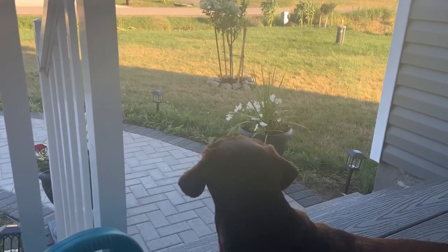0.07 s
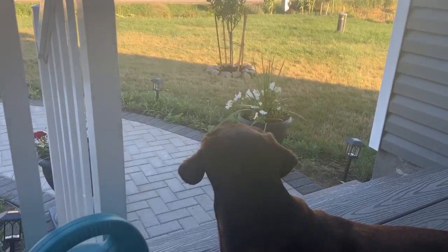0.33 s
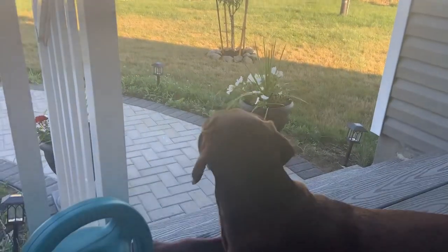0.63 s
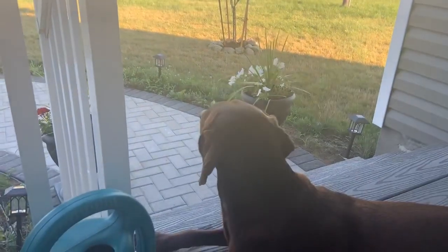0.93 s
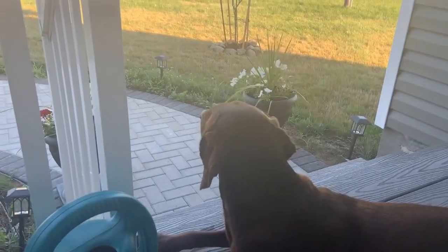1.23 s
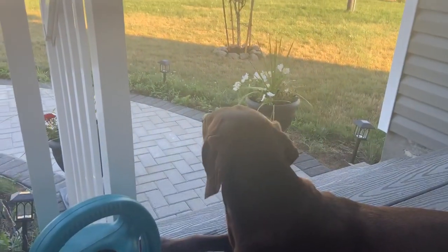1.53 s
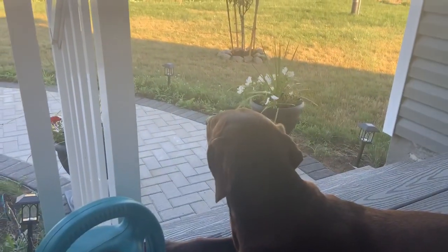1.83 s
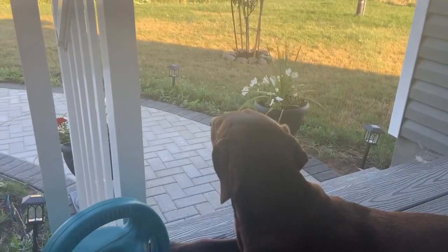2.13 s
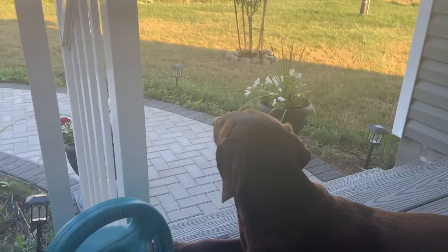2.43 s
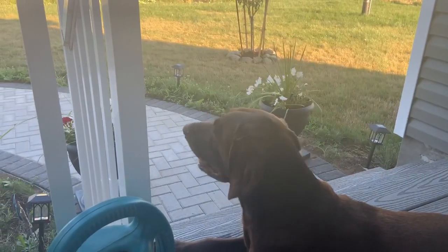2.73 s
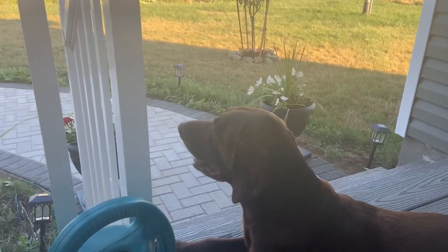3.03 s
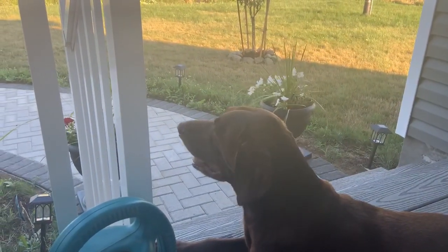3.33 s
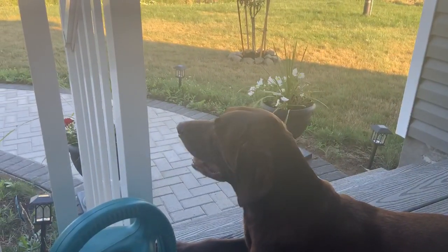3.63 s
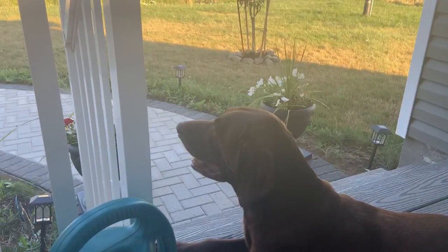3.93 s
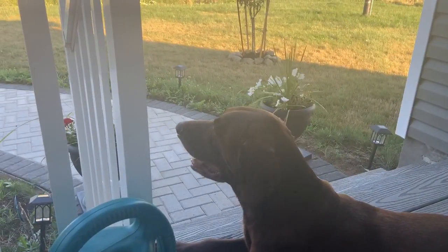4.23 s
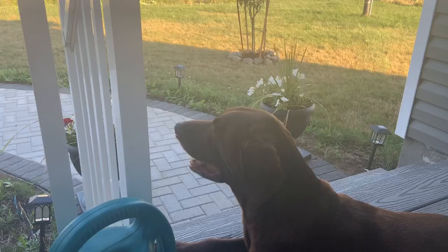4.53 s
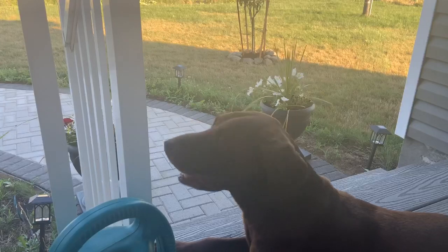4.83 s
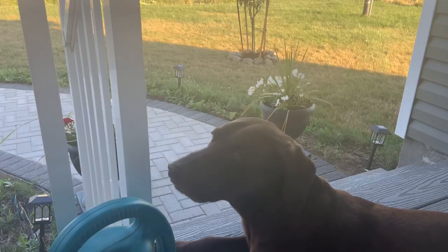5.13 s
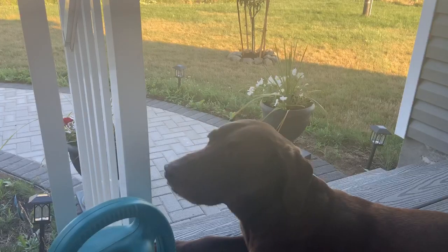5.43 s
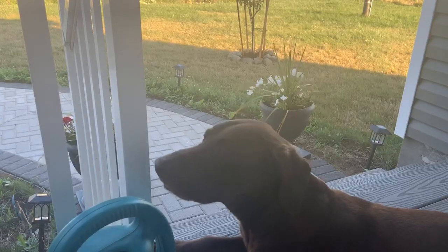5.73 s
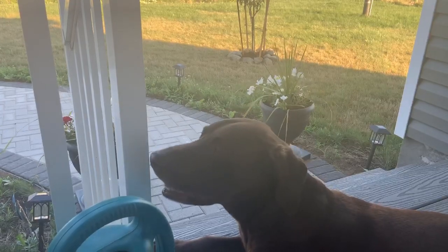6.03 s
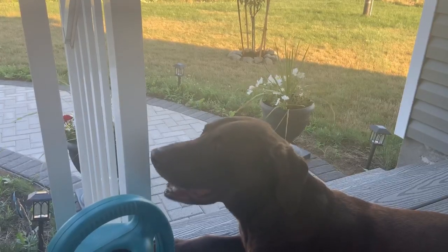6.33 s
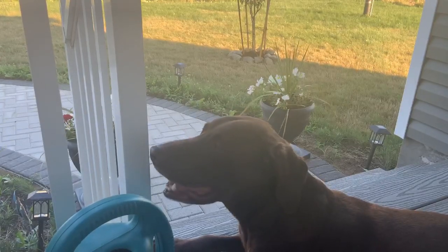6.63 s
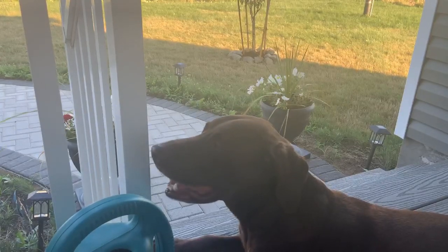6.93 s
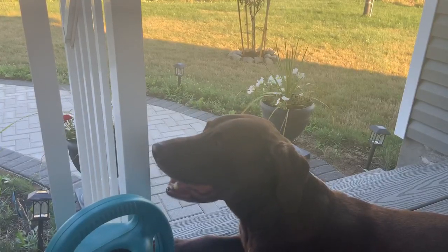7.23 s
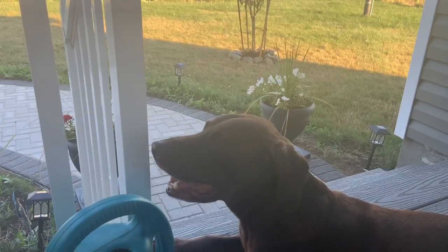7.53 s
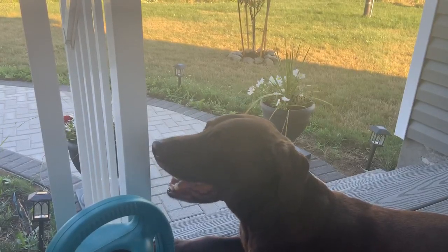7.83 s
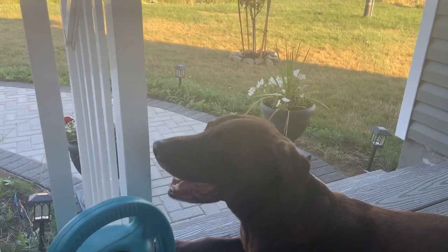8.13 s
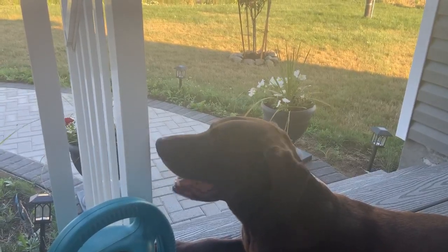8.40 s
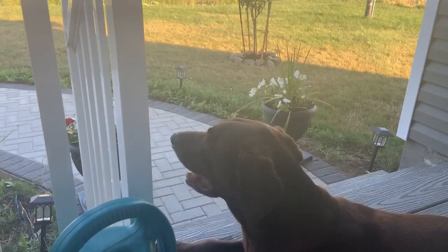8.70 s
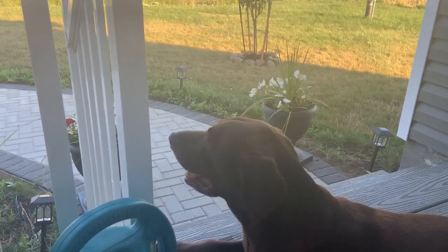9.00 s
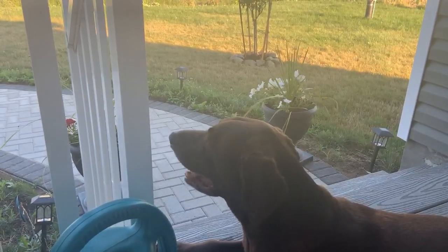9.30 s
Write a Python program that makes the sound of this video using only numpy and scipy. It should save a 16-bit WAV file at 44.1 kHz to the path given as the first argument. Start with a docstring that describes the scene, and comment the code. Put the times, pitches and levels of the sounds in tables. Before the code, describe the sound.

Crickets trill and buzz steadily outdoors over a distant traffic rumble, with a few soft, low microphone thumps.

```python
"""Crickets sing in the lawn by a porch on a summer evening, scraping one wing along the other.
Each stroke makes a tiny falling tone: some crickets run these into trills, one pulses in long bouts
and several give short high buzzes. Behind them are thin tree cricket tones and far engines and tyres.
Now and then soft thumps and knocks shake a hand-held camera. Something light rustles a few times,
and a far bird squeaks once."""
import sys
import numpy as np
from scipy import signal
from scipy.fft import rfft, irfft, next_fast_len
from scipy.io import wavfile
from scipy.ndimage import uniform_filter1d, map_coordinates

SR = 44100
rng = np.random.default_rng(int(sys.argv[2]) if len(sys.argv) > 2 else 0)


def transcribe(u):
    """Save the signal u as a 16-bit wav file named by the first command-line argument.

    u: samples, shape (n,) or (channels, n), limited to [-1, 1]; the rate is SR.
    q: integer samples, one column per channel.
    """
    v = np.clip(np.atleast_2d(u).T, -1, 1)
    q = np.round(v * 32767).astype(np.int16)
    wavfile.write(sys.argv[1], SR, q)


N = 421596


def amp(db):
    """Turn decibels into a gain to multiply by."""
    return 10 ** (np.asarray(db) / 20)


def unit(x):
    """Scale a sound so its average strength (rms) is 1."""
    return x / np.sqrt(np.mean(x ** 2) + 1e-20)


def clock(seconds):
    """The time of each sample in a stretch of seconds."""
    return np.arange(int(seconds * SR)) / SR


def along(points, hz):
    """Read between (Hz, value) points, spacing octaves evenly."""
    freqs, values = np.transpose(points)
    return np.interp(np.log(hz + 1), np.log(freqs), values)


def curve(rows):
    """Join (seconds, value) points with straight lines."""
    times, values = np.transpose(rows)
    return np.interp(np.arange(N) / SR, times, values)


def wobble(rate):
    """A smooth curve through `rate` random values a second."""
    return map_coordinates(rng.standard_normal(int(N * rate / SR) + 4), [np.arange(N) * rate / SR])


def swell(peak_s, width_s, db):
    """A gain that rises and falls in a bell shape around one moment."""
    return amp(db) * np.exp(-((np.arange(N) / SR - peak_s) / width_s) ** 2 / 2)


def bump(u):
    """A soft rise to 1 at u = 1, then a quick fade."""
    return u ** 2 * np.exp(2 * (1 - u))


def add(track, s, sound):
    """Mix a sound into a track, starting at s seconds."""
    part = track[max(round(s * SR), 0):][:len(sound)]
    part += sound[:len(part)]


def filtered(x, response):
    """Multiply each frequency in a sound by response(hz)."""
    size = next_fast_len(N + SR // 2)
    return irfft(rfft(x, size) * response(np.fft.rfftfreq(size, 1 / SR)), size)[..., :N]


def arrive(x, lead_ms):
    """Sound from one side reaches the left ear lead_ms before the right."""
    return filtered(x, lambda hz: np.exp(1j * np.pi * hz * lead_ms / 1000 * np.array([[1], [-1]])))


# How alike the two ears hear noise. Each row: frequency in Hz, likeness from 0 to 1.
LIKENESS = [(60, 0.88), (200, 0.89), (330, 0.95), (570, 0.25), (1000, 0.064), (3200, 0.59), (5000, 0.075)]
def rush(spectrum, alike=LIKENESS, lead_ms=0):
    """Stereo noise: one part is the same in both ears, the other is opposite."""
    turn = lambda hz: np.arccos(np.clip(along(alike, hz), -1, 1)) / 2
    colour = lambda hz: amp(along(spectrum, hz)) * [np.cos(turn(hz)), np.sin(turn(hz))]
    same, opposite = filtered(rng.standard_normal((2, N)), colour)
    return unit(arrive(np.array([same + opposite, same - opposite]), lead_ms))


# The yard's echo. Each row: frequency in Hz, seconds to fade by 60 dB.
YARD_FADE = [(2000, 0.14), (6000, 0.1), (10000, 0.094)]
def yard(x, lead_ms, wet_db):
    """Grass, steps and walls add a short scattered echo, wet_db above the direct sound."""
    hz, t, noise = signal.stft(rng.standard_normal((2, SR // 4)), SR, nperseg=256)
    tail = signal.istft(noise * amp(-60 * t / along(YARD_FADE, hz)[:, None]), SR, nperseg=256)[1]
    echo = signal.fftconvolve(x[None], tail / np.linalg.norm(tail[0]), axes=1)[:, :N]
    return (arrive(x, lead_ms) + amp(wet_db) * echo) / np.hypot(1, amp(wet_db))


def linger(x, fade_s):
    """The longer echo between house and trees, dropping 60 dB in fade_s."""
    t = clock(.5)
    tail = rng.standard_normal(len(t)) * amp(-60 * t / fade_s)
    return signal.fftconvolve(x, tail / np.linalg.norm(tail))[:N]


def trill(rate, start_hz, end_hz, stroke_s, judder, drift, rough):
    """An unbroken run of falling wing strokes; judder breaks each into three quick pulses."""
    strokes_done = np.cumsum(rate * (1 + drift * wobble(3))) / SR + rng.random()
    t = strokes_done % 1 / rate
    progress = np.minimum(t / stroke_s, 1)
    phase = 2 * np.pi * t * (start_hz + (end_hz - start_hz) * progress / 2) + rough * wobble(120)
    pulses = 1 - judder * np.cos(2 * np.pi * 3 * progress)
    return unit(np.abs(np.sin(np.pi * progress)) * pulses * np.sin(phase))


# The chorus singers. Each row: strokes a second, start and end pitch in Hz, stroke length in seconds,
# judder from 0 to 1, relative level in dB, throbs a second, throb depth in dB, left ear's lead in ms.
TRILLERS = [(83.7, 6120, 5330, .0098, .55, 0, 11.3, 3.4, .06),
            (65, 5620, 5230, .009, 0, -6.5, 11.3, 2, -.03), (96, 6060, 5620, .008, 0, -6.5, 7.5, 2, .02)]
# Their joint loudness. Each row: time in seconds, level in dB before the boost.
CHORUS_LEVELS = [(0.1, -74), (0.68, -74.5), (1.93, -74), (2.98, -69.5), (5.6, -76), (7.5, -73),
                 (9.11, -72.5), (9.5, -72.5)]
# A nearer, rougher cricket swells twice. Each row: peak time and half-width in seconds, level in dB.
NEAR_SWELLS = [(.7, 0.59, -63.5), (3.0, 0.76, -67.5)]
# A lower, purer one fades early. Each row: time in seconds, level in dB.
LOW_LEVELS = [(0, -79), (.8, -76), (1.7, -73.5), (2.2, -79), (3.1, -84.5), (4.2, -86), (9.5, -87)]
def chorus(boost_db=5):
    """Several ground crickets trill at once, each throbbing at its own pace."""
    t = np.arange(N) / SR
    voices, sway = np.zeros((2, N)), 2.2 * wobble(1.9)
    for rate, start_hz, end_hz, stroke_s, judder, db, throb_rate, throb_db, lead_ms in TRILLERS:
        throb = throb_db * np.sin(2 * np.pi * throb_rate * t + sway) + wobble(14)
        song = trill(rate, start_hz, end_hz, stroke_s, judder, drift=.003, rough=.85)
        voices += amp(db + throb) * yard(song, lead_ms, wet_db=-2.5)
    near = amp(1.3 * wobble(40)) * trill(86, 6190, 5540, .0098, judder=.2, drift=.007, rough=1.2)
    near_gain = np.max([swell(*row) for row in NEAR_SWELLS], axis=0)
    low = trill(65, 5420, 5290, .014, judder=0, drift=.004, rough=.8)
    return (amp(curve(CHORUS_LEVELS) + boost_db) * unit(voices)
            + near_gain * yard(near, lead_ms=.026, wet_db=-1.5)
            + amp(curve(LOW_LEVELS)) * unit(yard(low, lead_ms=.029, wet_db=-1.5)))


def patchy(x, depth_db):
    """Many far voices come and go: each patch of time and frequency gets its own gain."""
    patches = signal.stft(x, nperseg=512)[2]
    gains = rng.standard_normal(patches.shape[1:])
    gains = uniform_filter1d(gains, 3, axis=0)  # smooth across frequency
    gains = uniform_filter1d(gains, 14, axis=1)  # and across time
    return unit(signal.istft(patches * amp(depth_db * unit(gains)), nperseg=512)[1][:, :N])


# The road's loudness. Each row: time in seconds, level in dB before the boosts.
TRAFFIC_LEVELS = [(0.0, -61.5), (0.7, -64.5), (1.7, -61), (3.1, -61), (3.7, -61.5), (4.3, -60),
                  (5.8, -59.5), (7.2, -63), (8.1, -61), (9.56, -61)]
# The tone of engines and of tyres. Each row: frequency in Hz, relative level in dB.
ENGINE_SPECTRUM = [(13, -47), (22, -15.5), (30, -25.5), (43, 3), (91, -0.5), (104, -0.5), (146, -11.5),
                   (204, -9.5), (238, -14.5), (280, -12), (385, -17), (461, -18.5), (522, -27.5),
                   (600, -20.5), (780, -51), (1320, -120)]
TYRE_SPECTRUM = [(230, -22), (380, -7.5), (480, -3.5), (580, -4.5), (720, -2), (900, -1), (1050, -5.5),
                 (1300, -10), (1600, -14.5), (2200, -20.5), (2900, -29), (4800, -40), (7000, -66)]
def traffic(engine_boost_db=13.5, tyre_boost_db=4, usual_db=-59, engine_swing=1.5):
    """Engines rumble and tyres roar on a far road; the engines rise and fall more widely."""
    road_db = curve(TRAFFIC_LEVELS)
    engine_db = usual_db + engine_swing * (road_db - usual_db) + engine_boost_db + .9 * wobble(7)
    tyre_db = road_db + tyre_boost_db + .6 * wobble(8)
    engines = amp(engine_db) * rush(ENGINE_SPECTRUM)
    roar = rush(TYRE_SPECTRUM, alike=[(400, .14), (1000, .56), (3000, .066)], lead_ms=-.27)
    tyres = amp(tyre_db) * patchy(roar, depth_db=2) * amp([[.8], [-.8]])
    return engines + tyres


# The tone of the insect hiss. Each row: frequency in Hz, relative level in dB.
HISS_SPECTRUM = [(2500, -15), (4000, -0.5), (6600, 3.5), (8200, -3.5), (9200, -13), (10200, -19.5)]
def far_insects(level_db=-76):
    """Countless far insects blend into a faint hiss."""
    return amp(level_db) * patchy(rush(HISS_SPECTRUM), depth_db=3.5)


# Far tree crickets. Each row: pitch in Hz, strokes a second, base level in dB.
TREE_CRICKETS = [(2242, 42, -92), (2471, 48, -91)]
# The air carries one closer. Each row: which cricket, peak time and half-width in seconds, level in dB.
TREE_SWELLS = [(0, .3, .25, -81.5), (0, 4.9, .35, -87), (1, .45, .15, -85), (1, 3.9, .45, -80.5),
               (1, 5.1, .3, -85.5), (1, 7.8, .15, -84.5), (1, 8.6, .25, -89)]
def tree_crickets():
    """Thin far tones flutter with the wing strokes and fade in and out on the air."""
    t = np.arange(N) / SR
    tones = np.zeros((2, N))
    for cricket, (hz, rate, db) in enumerate(TREE_CRICKETS):
        tone = np.sin(2 * np.pi * np.cumsum(hz + 3 * wobble(25)) / SR)
        flutter = 1 + .18 * np.sin(2 * np.pi * rate * t)
        swells = sum(swell(*row) for which, *row in TREE_SWELLS if which == cricket)
        gain = np.hypot(amp(db), swells) * amp(2.2 * wobble(22) - .5)
        tones += gain * unit(yard(tone * flutter, lead_ms=.05, wet_db=-12))
    return tones


def stroke(length, start_hz, end_hz, bend, rough_hz):
    """One wing closure: the scraper slows along a row of teeth, so the tone falls."""
    progress = clock(length) / length
    uneven_teeth = np.interp(progress, np.linspace(0, 1, 8), rng.normal(0, 1, 8))
    pitch = start_hz + (end_hz - start_hz) * progress ** bend + rough_hz * uneven_teeth
    return np.abs(np.sin(np.pi * progress)) ** .75 * np.sin(2 * np.pi * np.cumsum(pitch) / SR)


def high_pulser(rate=16.6, stroke_s=.016, hz=8480, fall_hz=520, level_db=-69.5, spread_db=3.5):
    """A thin, high cricket makes single falling strokes at an even pace but with uneven force."""
    song = np.zeros(N)
    for beat in np.arange(0, N / SR, 1 / rate):
        start = beat + rng.normal(0, .004)
        force = amp(rng.normal(level_db, spread_db))
        add(song, start, force * stroke(stroke_s, hz, hz - fall_hz, bend=2, rough_hz=50))
    return yard(song, lead_ms=.05, wet_db=-4)


def buzzes(calls, length, rate, stroke_s, pitch_hz, fall_hz, rough_hz, edge_db_per_s=703):
    """One cricket buzzes at each (seconds, dB) call: a run of quick strokes that swells and fades."""
    song = np.zeros(N)
    for start, db in calls:
        pace, hz = rng.normal([rate, pitch_hz], [2, 20])
        for delay in np.arange(-2 / pace, length + 1 / pace, 1 / pace):
            outside_s = max(-delay, delay + 1 / pace - length, 0)
            force = amp(db - edge_db_per_s * outside_s + rng.normal(0, 1.2))
            tone = stroke(stroke_s, hz, hz - fall_hz, bend=.88, rough_hz=rough_hz)
            add(song, start + delay, force * tone)
    return song


# The nearest buzzer's even phrases. Each row: first and last buzz in seconds, number of buzzes.
NEAR_PHRASES = [(.252, 2.345, 8), (2.675, 3.02, 2), (3.32, 3.915, 3), (4.28, 5.85, 6), (6.125, 9.335, 11)]
# A rival's looser answers. Each row: start in seconds, level in dB.
RIVAL_CALLS = [(.085, -62), (.695, -60), (1.0, -59), (1.28, -60), (1.56, -59), (1.81, -60), (2.16, -61),
               (2.545, -59), (2.81, -60), (3.06, -60), (3.37, -63), (3.63, -60), (3.855, -60), (4.115, -61),
               (4.825, -58), (5.115, -58), (5.375, -58), (5.65, -59), (5.925, -59), (6.16, -58),
               (6.42, -60), (7.085, -60), (7.315, -59), (7.615, -59), (7.875, -61), (8.12, -61),
               (8.375, -58), (8.59, -59), (9.06, -62), (9.275, -61), (9.51, -60)]
# Farther buzzers. Each row: seconds between buzzes, pitch in Hz, level in dB.
FAR_BUZZERS = [(.47, 8500, -76), (.52, 8920, -75), (.29, 8850, -78)]
def buzzing_crickets(near_db=-55.5, jitter_s=.032, spread_db=3):
    """High singers keep their own beats, drifting in and out of step; far ones and echo fill the gaps."""
    calls = [(s, near_db) for phrase in NEAR_PHRASES for s in np.linspace(*phrase)]
    song = buzzes(calls, length=.074, rate=111, stroke_s=.0078, pitch_hz=8860, fall_hz=250, rough_hz=45)
    song += buzzes(RIVAL_CALLS, length=.06, rate=130, stroke_s=.012,
                   pitch_hz=8930, fall_hz=280, rough_hz=85)
    for beat_s, hz, db in FAR_BUZZERS:
        times = np.arange(beat_s * rng.random(), N / SR, beat_s)
        calls = [rng.normal([s, db], [jitter_s, spread_db]) for s in times]
        song += buzzes(calls, length=.052, rate=100, stroke_s=.012, pitch_hz=hz, fall_hz=230, rough_hz=97)
    return yard(song + amp(-10.5) * linger(song, fade_s=.36), lead_ms=.053, wet_db=-17)


# Soft bumps. Each row: start in seconds, base level in dB, pitch in Hz, seconds between rebounds,
# dB lost with each rebound.
THUMPS = [(0.174, -32, 89, 0.051, 26), (.207, -18, 89.5, 0.057, 7), (.282, -23.5, 63.6, 0.058, 5),
          (2.076, -36, 60, 0.048, 8), (3.409, -26.5, 71.6, .06, 25), (4.768, -33.5, 58, 0.27, 9),
          (4.817, -29.5, 62, 0.045, 1.1), (6.424, -31, 87.5, 0.05, 17), (6.465, -18.5, 75.4, .06, 3.5),
          (6.618, -30, 100, 0.049, 18), (6.74, -34, 59, 0.085, 7), (8.062, -34, 56, 0.091, 3.5),
          (9.507, -29, 66.5, 0.061, 20)]
def thumps(push_db=-1, rise_cycles=.73, shudder_db=-20, shudder_s=.029, bounces=4):
    """Each bump gives the camera a short low swing and a shudder, then rebounds ever more weakly."""
    push, shudder, t = np.zeros(N), np.zeros(N), clock(.31)
    for start, first_db, hz, rebound_s, loss_db in THUMPS:
        swing = bump(t * hz / rise_cycles) * np.sin(2 * np.pi * hz * t)
        for k in range(bounces):
            s, db = start + k * rebound_s, first_db - k * loss_db
            add(push, s, amp(db + push_db) * swing)
            add(shudder, s, amp(db + shudder_db) * bump(t / shudder_s))
    frame_noise = rush([(30, -4.5), (60, 9), (180, 1.5), (300, -13.5), (500, -30), (1200, -60)],
                       alike=[(30, .4), (500, .41)])
    return arrive(push, lead_ms=.17) + shudder * frame_noise


# Harder knocks among the thumps. Each row: start in seconds, level in dB, pitch in Hz.
KNOCKS = [(.192, -37.5, 358), (.197, -25, 215), (.257, -38, 234), (.281, -33.5, 280), (3.42, -31.5, 139),
          (4.863, -42, 219), (6.458, -37, 222), (6.489, -25.5, 150.6), (6.499, -34, 335), (6.511, -28, 208),
          (6.515, -54, 563), (6.538, -36, 255), (6.586, -32, 188)]
def knocks(overtone_ratio=1.646, overtone_db=-14, rise_s=.0051):
    """Firmer contacts ring two dull tones for a few cycles."""
    track, t = np.zeros(N), clock(.08)
    for start, db, hz in KNOCKS:
        phase = 2 * np.pi * hz * t
        ring = np.sin(phase) + amp(overtone_db) * np.sin(overtone_ratio * phase)
        add(track, start, amp(db) * bump(t / rise_s) * ring)
    return arrive(track, lead_ms=.25)


# Bouts of pulsing. Each row: start and end in seconds, pulses a second.
BOUTS = [(0.339, 3.2, 16.19), (3.486, 7.69, 16.36), (8.066, 9.65, 16.2)]
# The two strokes of a pulse. Each row: delay and length in seconds, relative level in dB,
# fraction by which the pitch falls.
PULSE_STROKES = [(-.004, 0.022, -3, 0.1), (0.014, .021, 0.5, 0.16)]
def pulsing_cricket(level_db=-65, pitch_hz=7780, warm_up_s=.15, echo_s=.0105):
    """Double wing strokes in long bouts that start soft and a little low; wall and trees blur them."""
    song = np.zeros(N)
    for start, end, rate in BOUTS:
        for s in np.arange(start, end - 1 / rate, 1 / rate):
            cold = np.exp(-(s - start) / warm_up_s)
            for delay, length, db, fall in PULSE_STROKES:
                late, hz, force_db = rng.normal([0, pitch_hz - 240 * cold, -5 * cold], [.0025, 22, 1.2])
                tone = stroke(length, hz, hz * (1 - fall), bend=3.8, rough_hz=35)
                add(song, s + delay + late, amp(level_db + db + force_db) * tone)
    wall_echo = np.zeros(N)
    add(wall_echo, echo_s, amp(-5.5) * song)
    return yard(song + wall_echo + amp(-4) * linger(song, fade_s=.3), lead_ms=.045, wet_db=3.5)


# One engine's tones. Each row: multiple of its pitch, relative level in dB, waver in Hz.
DRONE_TONES = [(1, 0, 0.74), (1.245, -9, 1.2), (2.22, -14, 2), (3.06, -15.5, 3), (5.14, -18.5, 5)]
def engine_drone(peak_s=2.1, pitch_hz=91.85, rise_hz_per_s=1.82):
    """One engine hums out of the traffic, its wavering tones rising together as it speeds up."""
    pitch = pitch_hz + rise_hz_per_s * (np.arange(N) / SR - peak_s)
    hum = np.zeros(N)
    for multiple, db, waver_hz in DRONE_TONES:
        tone = np.sin(2 * np.pi * np.cumsum(multiple * pitch + waver_hz * wobble(9)) / SR)
        hum += amp(db + 1.7 * wobble(8)) * unit(tone)
    return swell(peak_s, width_s=.82, db=-50.5) * hum


# Small rustles. Each row: start in seconds, level in dB before the trim.
RUSTLES = [(1.905, -63), (4.81, -72), (5.3, -74), (5.46, -73), (6.53, -71)]
def rustles(trim_db=-5, rise_s=.003, fade_s=.026):
    """Something light brushes by in brief, dry puffs of noise."""
    gain, t = np.zeros(N), clock(.15)
    for start, db in RUSTLES:
        add(gain, start, amp(db + trim_db) * (1 - np.exp(-t / rise_s)) * np.exp(-t / fade_s))
    return gain * rush([(1000, -28), (3000, -5.5), (4100, 4.5), (4700, -8), (5500, -20), (9000, -40)])


# The bird's squeak. Each row: start and length in seconds, pitch in Hz, level in dB.
SQUEAKS = [(5.875, .06, 2710, -75)]
def bird():
    """A faint, rough, slightly falling squeak comes from across the lawn."""
    song = np.zeros(N)
    for start, length, hz, db in SQUEAKS:
        tone = stroke(length, hz, hz * .98, bend=1, rough_hz=35)
        rasp = 1 + .7 * wobble(300)[:len(tone)]
        add(song, start, amp(db) * tone * rasp)
    return yard(song, lead_ms=.05, wet_db=0)


def scene():
    """Crickets in front, the road behind, thumps close by."""
    trills = chorus() * amp([[-.8], [.8]])  # a little louder on the right
    crickets = trills + pulsing_cricket() + high_pulser() + buzzing_crickets() + tree_crickets()
    distance = traffic() + far_insects() + engine_drone()
    return crickets + distance + thumps() + knocks() + rustles() + bird()


def record(dry, top_hz=10100):
    """The camera softens the highest treble and keeps nothing above top_hz."""
    treble_sag = [(9000, 0), (9500, -3), (10000, -7)]  # Hz, dB
    return filtered(dry, lambda hz: amp(along(treble_sag, hz)) * (hz < top_hz))


dry = scene()
out = record(dry)
transcribe(out)
```